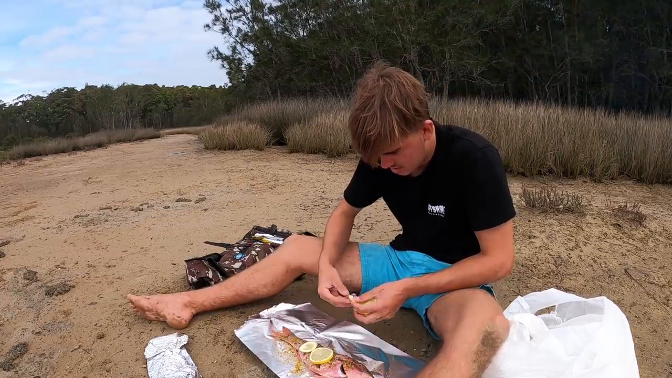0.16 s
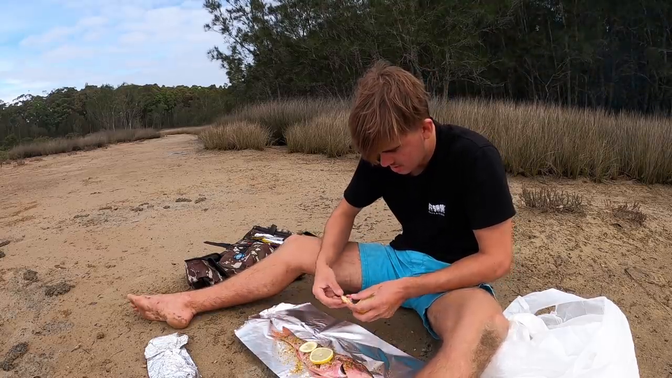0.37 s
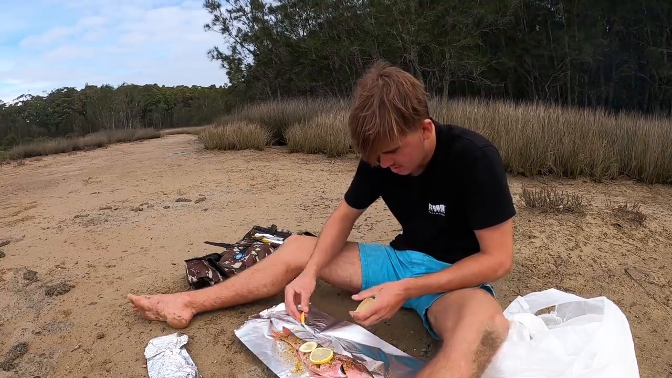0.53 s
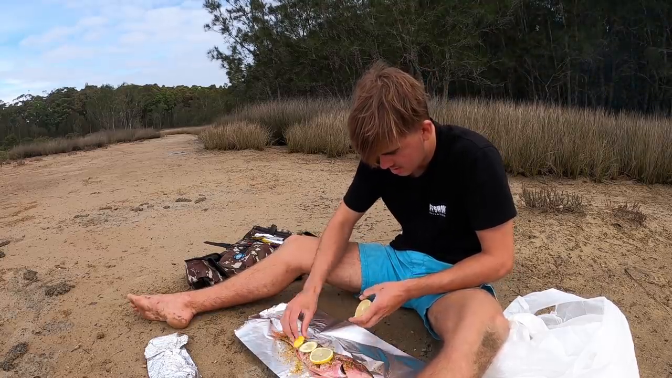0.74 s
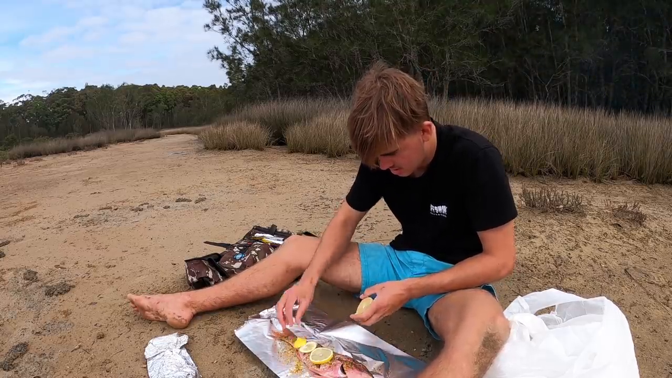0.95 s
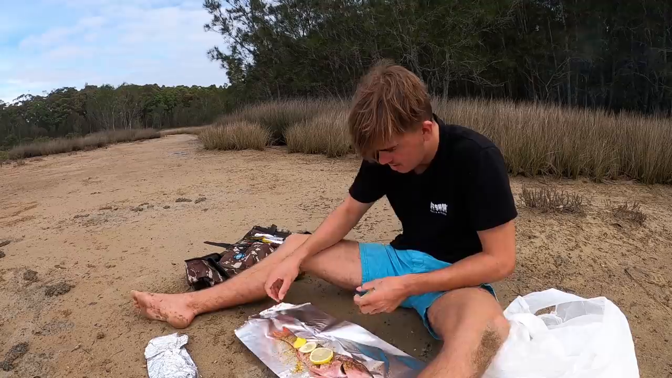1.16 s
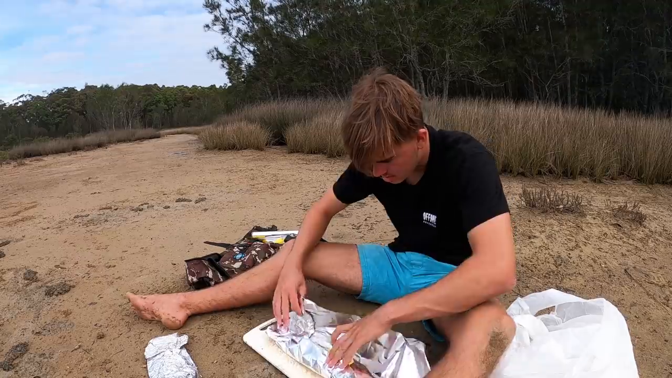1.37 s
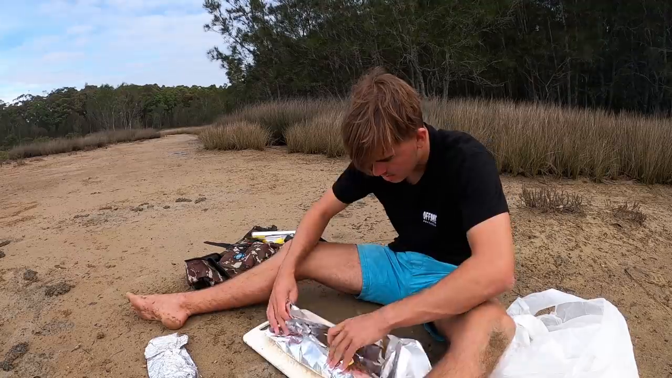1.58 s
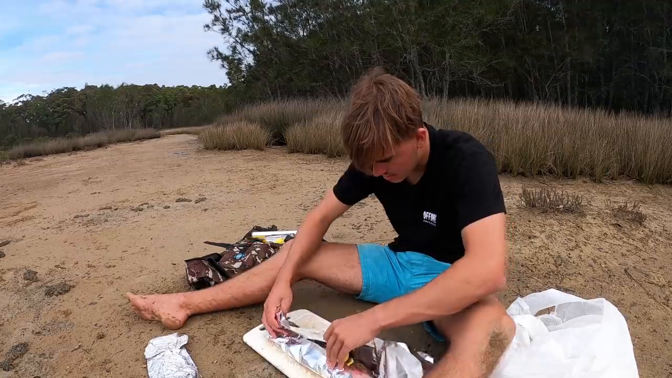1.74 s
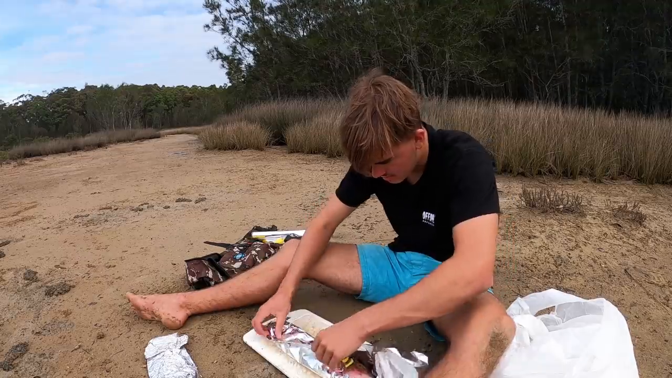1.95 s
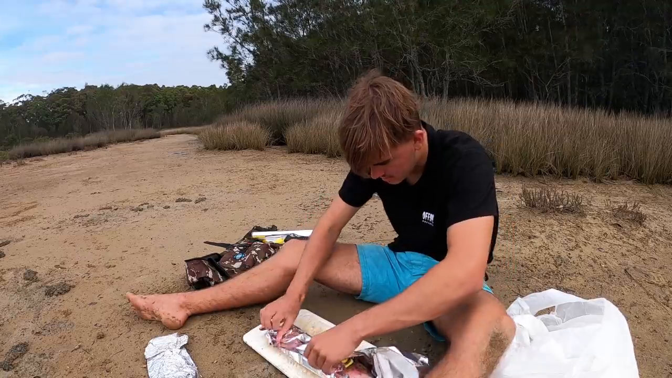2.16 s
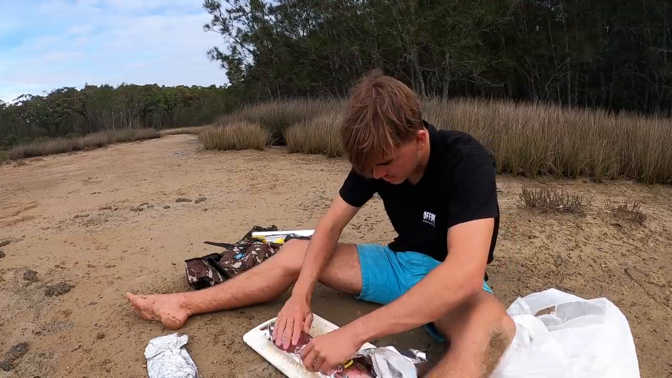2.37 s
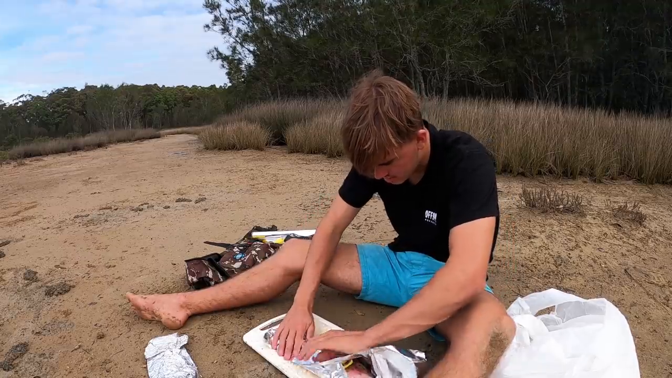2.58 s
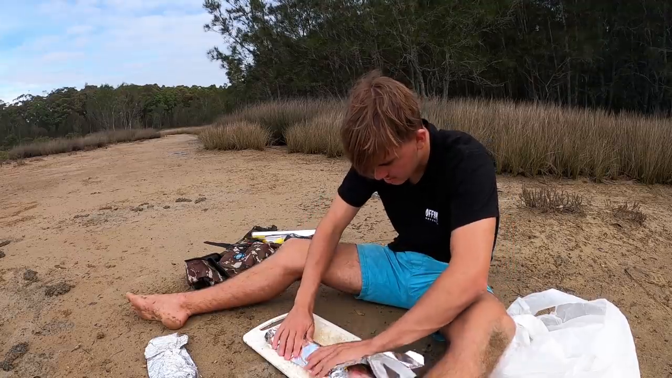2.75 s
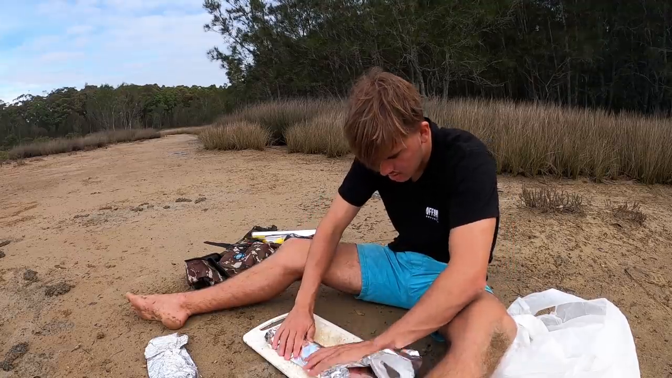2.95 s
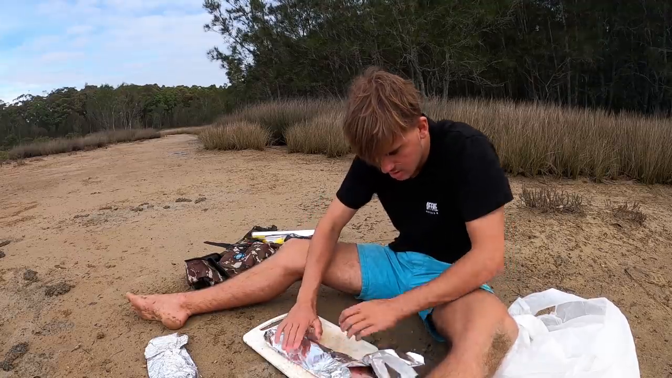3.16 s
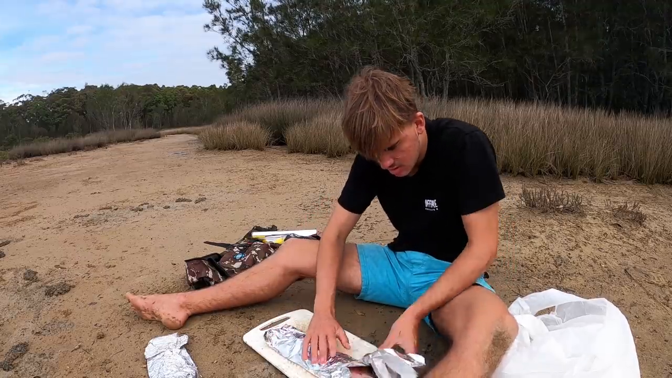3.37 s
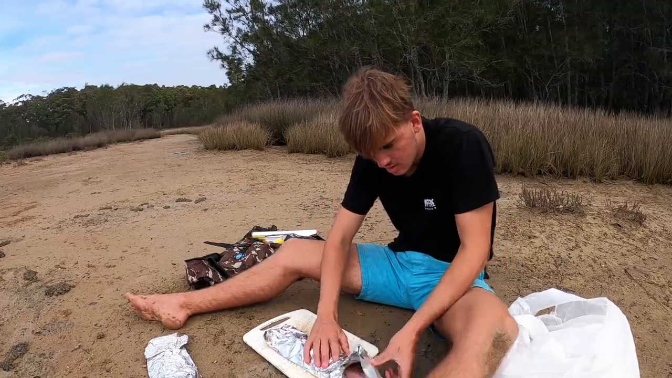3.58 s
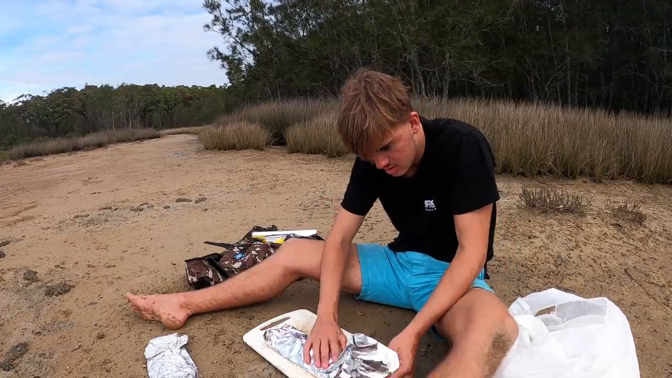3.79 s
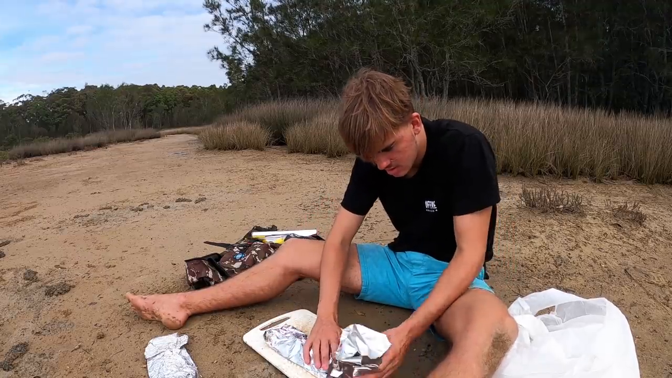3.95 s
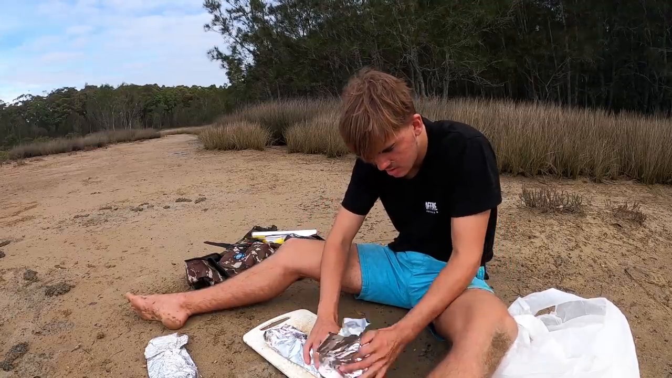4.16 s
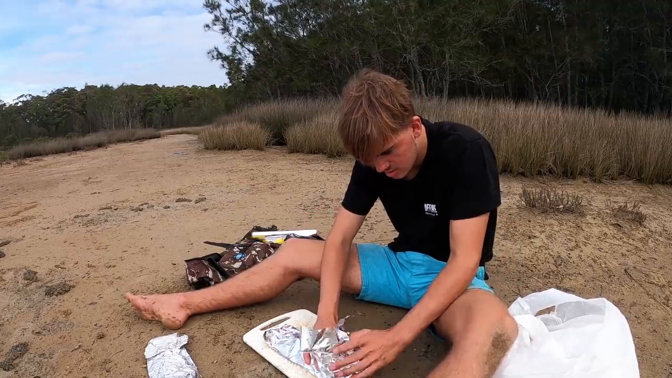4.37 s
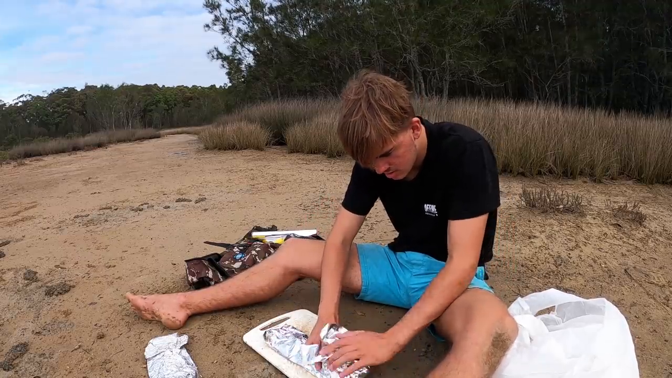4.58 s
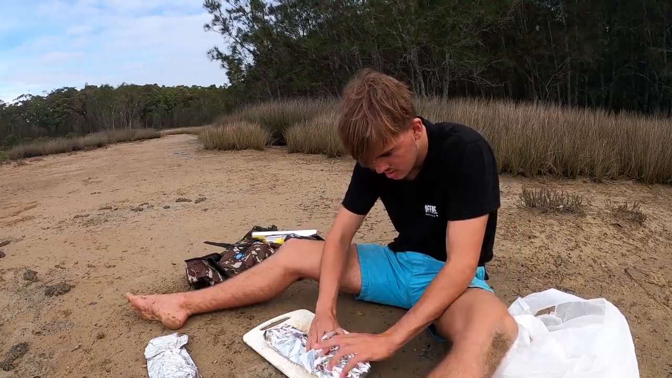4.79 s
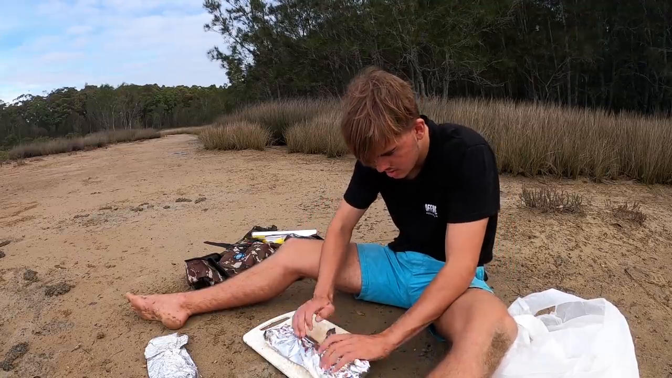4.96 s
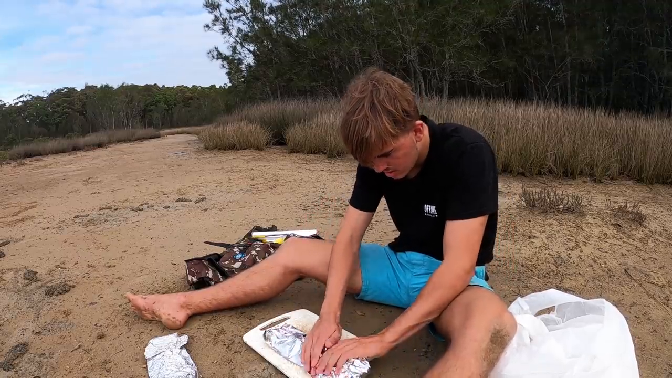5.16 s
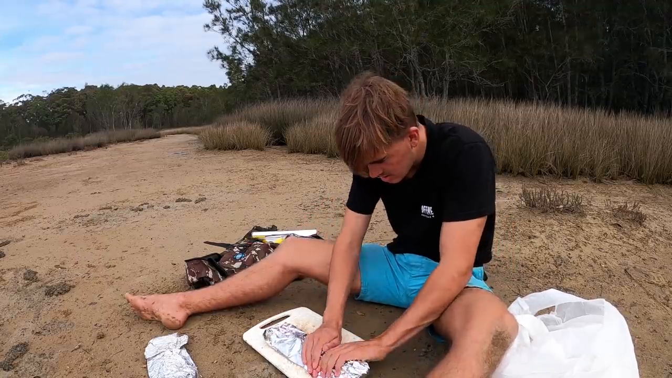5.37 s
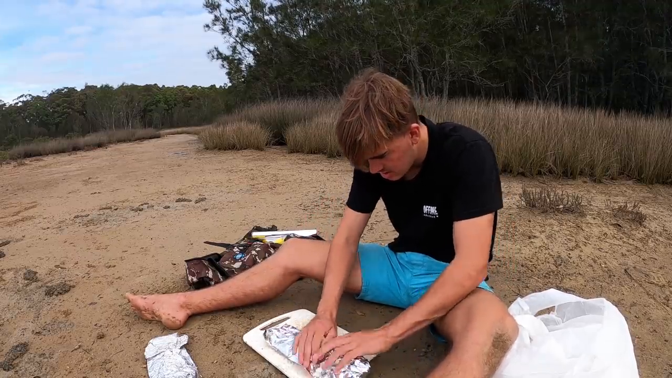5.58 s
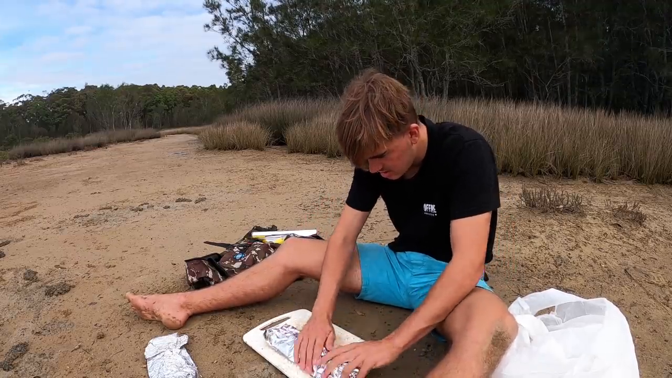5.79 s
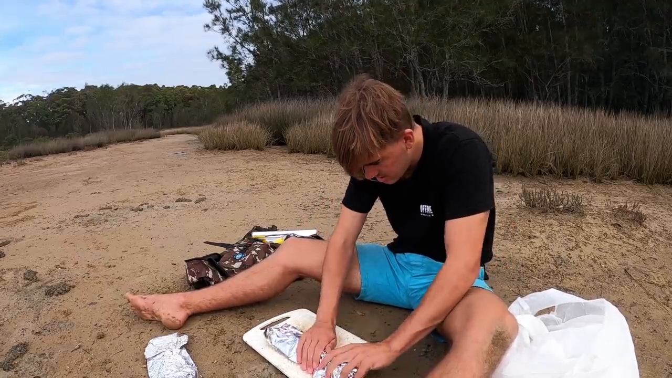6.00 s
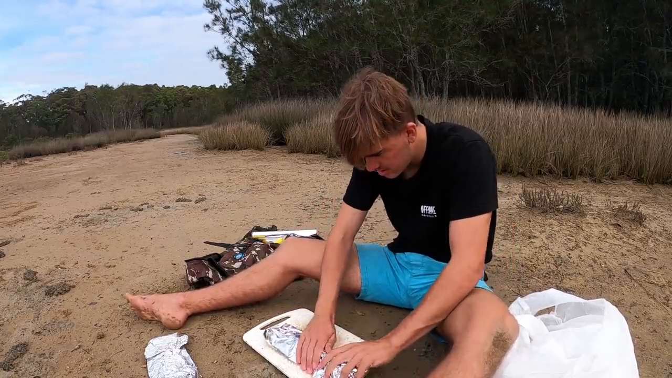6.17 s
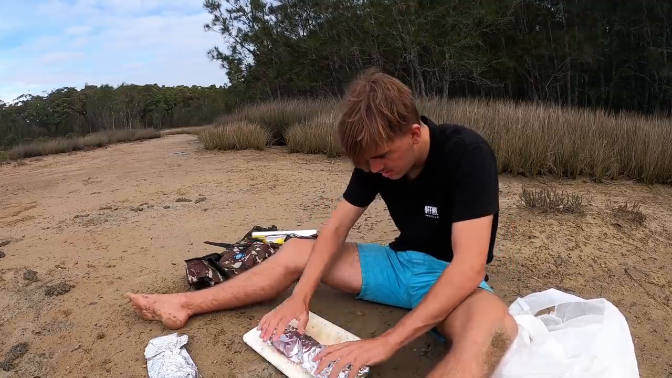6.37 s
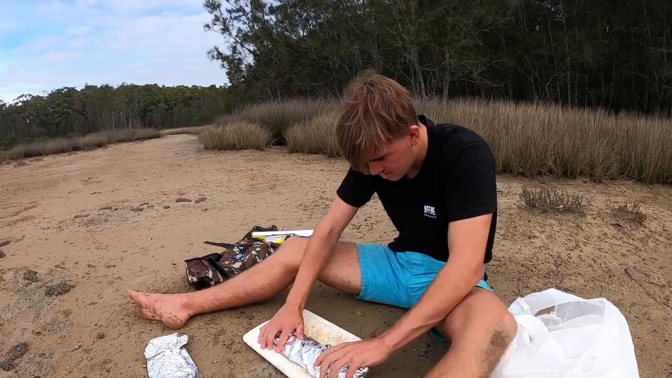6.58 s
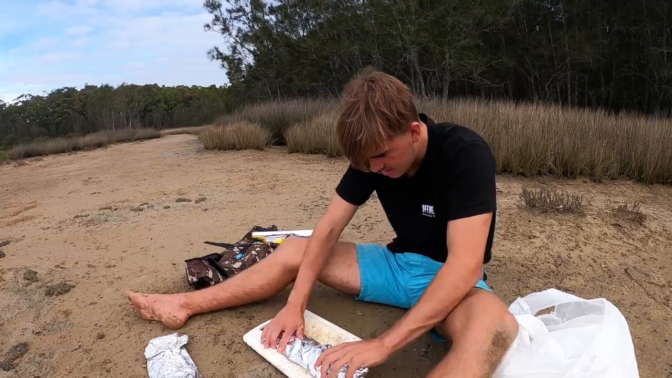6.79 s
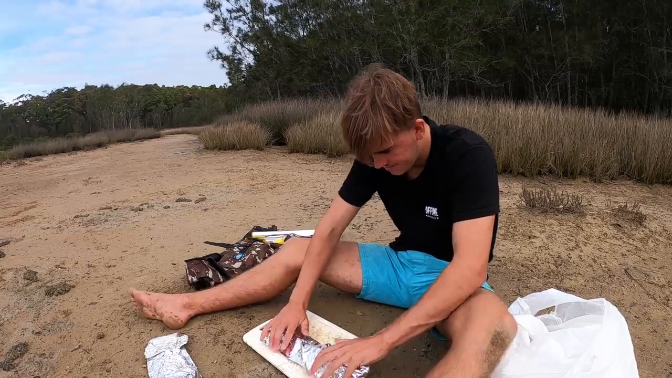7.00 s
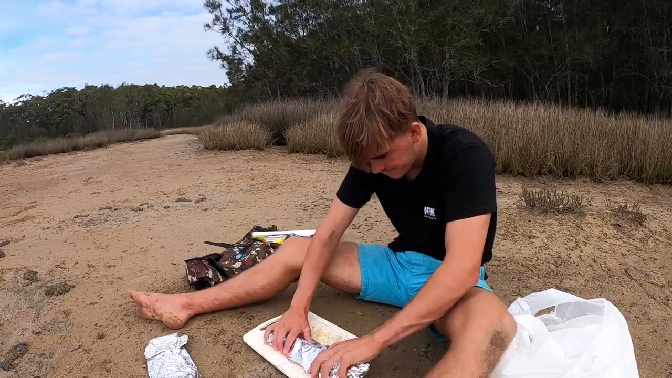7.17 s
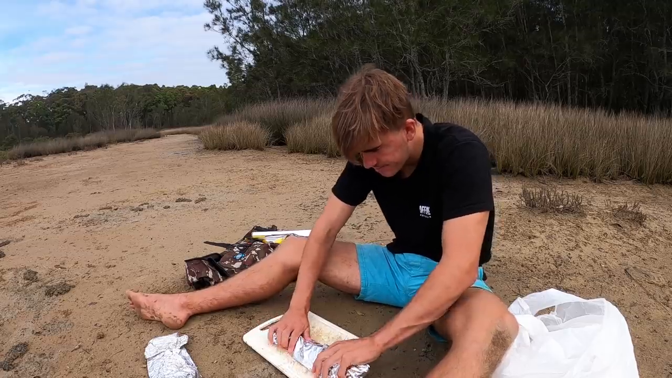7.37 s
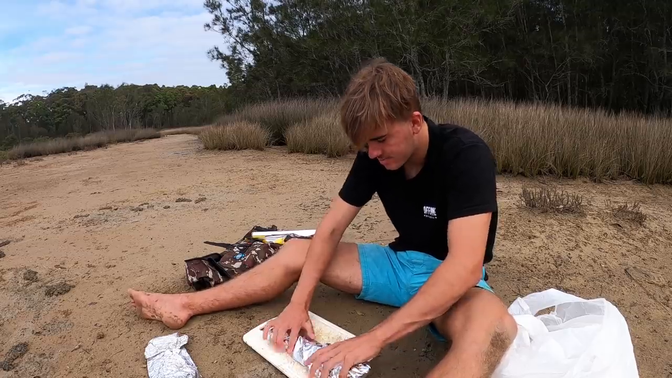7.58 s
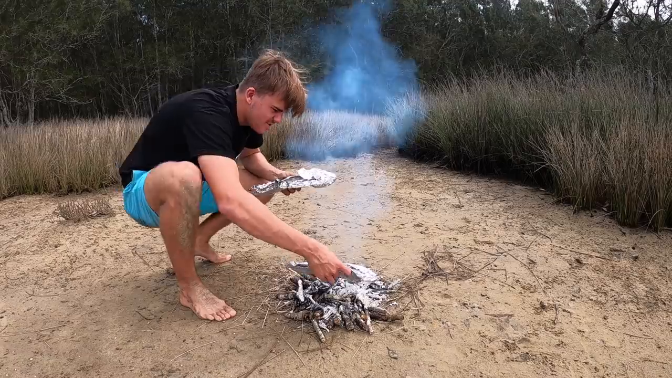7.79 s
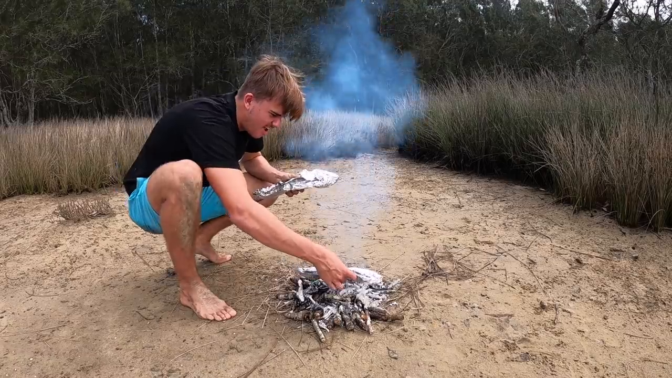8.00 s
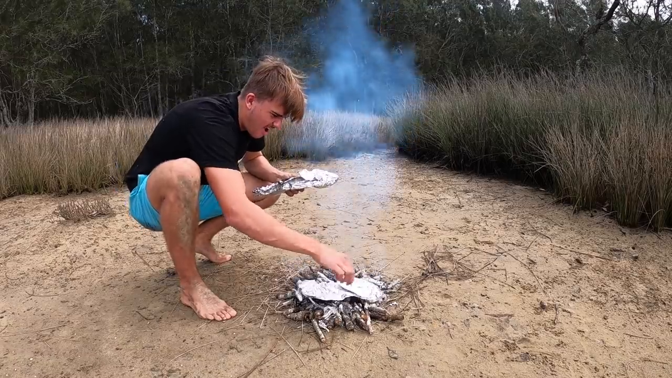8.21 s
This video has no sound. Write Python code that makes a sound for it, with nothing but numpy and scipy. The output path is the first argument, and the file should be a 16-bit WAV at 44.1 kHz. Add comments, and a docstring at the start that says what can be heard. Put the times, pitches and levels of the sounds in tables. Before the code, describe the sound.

From 0 to 1.25 s there is only smooth, faint open-air noise and an uneven low rumble, with two or three barely audible ticks. At about 1.3 s aluminium foil enters abruptly: hands grip and fold it, making dense bright crackles, crisp snaps and popping creases, strong until 3.1 s. A short lull around 3.3-3.5 s leaves soft rustle and a very faint whistle. From 3.55 to 5.5 s the crinkling is busiest, with sharp pops and hollow knocks of slack panels, especially around 4.4-4.9 s. Tighter, smaller presses follow in bursts to 6.4 s; after another tiny pause, crackles continue from 6.55 to 7.7 s, gradually gentler. Then it is nearly quiet, with light ticks and a last small flurry near 8.0-8.2 s. Close, dry, centred, outdoors, rumble swelling beneath throughout.

```python
"""Outdoors on open ground, hands fold and press aluminium foil round food on a board.
Each grip buckles creases: dense clumps of random snaps strike a bank of short resonances tuned as facets.
Single folds pop and slack panels knock as swelling, dying rings, each with a rattle of filtered noise.
Below lie a soft rustle, a faint whistle in two pauses, a lumpy low rumble and smooth air, all shaped noise.
Both channels carry nearly the same sound."""
import sys
import numpy as np
from scipy import signal
from scipy.fft import rfft, irfft, next_fast_len
from scipy.io import wavfile
from scipy.ndimage import uniform_filter1d

SR = 44100
rng = np.random.default_rng(int(sys.argv[2]) if len(sys.argv) > 2 else 0)


def dump_mix(stems):
    """Bounce the given channels to the path in sys.argv[1] as a 16-bit WAV at rate SR."""
    frames = np.atleast_2d(stems).T  # one column per channel
    limited = np.clip(frames, -1, 1)  # hard clip at full scale
    pcm = np.round(limited * 32767).astype(np.int16)
    wavfile.write(sys.argv[1], SR, pcm)


N = 363384

# spectrum of the foil: frequency_hz, level_db (density, relative)
FOIL_SPECTRUM = [(120, -19), (200, -10.5), (283, -6.5), (465, -8.5), (601, -8.5), (791, -5.5), (1300, -5.5),
                 (3620, 0), (7540, -8), (8420, -13), (13100, -22), (16000, -23)]
# each grip of the hands on the foil: start_s, end_s, crackle_start_db, crackle_end_db,
# slack_panels_db (against the crackle), brightness_db_per_octave
HAND_GRIPS = [(1.275, 1.46, -57.5, -41, -24, -0.5), (1.468, 2.295, -39, -35, -15.5, 0.2),
              (2.29, 2.506, -38, -44.5, -15.5, 0), (2.516, 2.763, -40.5, -37, -14.5, -.3),
              (2.776, 3.055, -36.5, -39, -11.5, -0.2), (3.088, 3.294, -45, -49, -18, -1.7),
              (3.536, 3.652, -42.5, -36.5, -16, 0.2), (3.695, 4.146, -36, -34.5, -13.5, .3),
              (4.158, 4.764, -40.5, -33.5, -14, -0.55), (4.774, 5.039, -38, -38, -12.5, -0.8),
              (5.051, 5.193, -38, -43, -20, -1.7), (5.192, 5.256, -38.5, -39, -16, -2.5),
              (5.276, 5.494, -35.5, -42.5, -16, -2), (5.5, 5.742, -54.5, -41, -19.5, -0.1),
              (5.746, 5.824, -48, -56, -13, 0.5), (5.903, 6.133, -39, -42.5, -18, -.3),
              (6.168, 6.411, -60.5, -41, -16.5, -0.6), (6.541, 6.572, -41.5, -47, -10, 2.3),
              (6.581, 6.643, -38, -38, -15, .3), (6.657, 6.858, -41.5, -42, -18, -0.3),
              (6.85, 6.935, -54, -49, -23, .3), (6.937, 7.08, -62.5, -44.5, -21, 0.5),
              (7.054, 7.496, -44.5, -41.5, -15.5, .3), (7.505, 7.59, -50, -60.5, -14, -0.5),
              (7.597, 7.732, -51, -46, -18, 0.5), (8.045, 8.178, -56.5, -63.5, -20, -0.5),
              (8.182, 8.236, -44, -43.5, -8.5, 4)]


def from_db(db):
    """Decibels to gain."""
    return 10 ** (np.asarray(db) / 20)


def rms_one(x):
    """Scale to rms 1."""
    return x / np.sqrt(np.mean(x ** 2) + 1e-20)


def noise():
    """White noise as long as the scene."""
    return rng.standard_normal(N)


def in_time(rows):
    """Columns of a curve, one value per sample; the first column is time in seconds."""
    s, *columns = np.transpose(rows)
    return [np.interp(np.arange(N) / SR, s, c) for c in columns]


def at_hz(points, hz):
    """Read a spectrum in dB on a log frequency axis."""
    table_hz, table_db = np.array(points).T
    return np.interp(np.log(hz), np.log(table_hz), table_db)


def drift(rate_hz):
    """Slow chance: noise through a double one-pole low-pass, spread 1, made at an eighth of the rate."""
    r = np.exp(-2 * np.pi * rate_hz * 8 / SR)
    raw = rng.standard_normal(N // 8 + 4002)
    slow = signal.lfilter([1], [1, -2 * r, r * r], raw)[4000:]   # skip the settling of the filter
    return np.interp(np.arange(N) / 8, np.arange(len(slow)), rms_one(slow))


def ring(x, hz, width_hz):
    """Two-pole resonance with a gain of about 1 on top."""
    r = np.exp(-np.pi * width_hz / SR)
    zeros = np.array([1, 0, -1]) * (1 - r * r) / 2
    poles = [1, -2 * r * np.cos(2 * np.pi * hz / SR), r * r]
    return signal.lfilter(zeros, poles, x + 1e-18)


def colour(x, spectrum):
    """Filter a signal by the spectrum of a table."""
    size = next_fast_len(N)
    hz = np.maximum(np.arange(size // 2 + 1) * SR / size, 1)
    return irfft(rfft(x, size) * from_db(at_hz(spectrum, hz)), size)[:N]


def evened(x, span_s):
    """Slow swells divided out, so that a curve alone sets the level."""
    span = int(span_s * SR)
    power = uniform_filter1d(uniform_filter1d(x ** 2, span), span)
    return x / np.sqrt(power + 1e-20)


def slope_db(t, start, end, rise, fall):
    """0 dB from start to end, a straight rise before and a straight fall after, in dB per second."""
    return np.minimum(0, np.minimum(rise * (t - start), fall * (end - t)))


def hands():
    """The strongest grip or squeeze sets the crackle; a grip also sets slack panels and brightness."""
    # short hard squeezes: time_s, crackle_db
    hard_squeezes = [(1.505, -34), (1.635, -32), (1.72, -35), (1.841, -32.5), (1.915, -32.5), (2.257, -30),
                     (2.647, -30.5), (2.873, -28), (3.131, -34.5), (3.702, -28.5), (3.862, -30),
                     (4.1, -32.5), (4.55, -34.5), (5.001, -32), (5.921, -37.5)]
    grip_db_per_s, let_go_db_per_s = 1802, 1100
    squeeze_db_per_s, ease_db_per_s = 291, 290
    rest_db, rest_slack_db = -66, -3.5   # stray snaps and panels between grips
    slack_lag_s = 0.033   # large panels follow the hands sluggishly
    packed_s, open_wide_db, packed_wide_db = 4.75, 0, -6   # the widest panels weigh less once the parcel closes

    t = np.arange(0, N / SR, 1 / 1000)   # worked out each millisecond
    level_db = np.full(len(t), float(rest_db))
    slackness_db = np.full(len(t), rest_slack_db)
    tilt_db = np.zeros(len(t))
    for start, end, first_db, last_db, grip_slack_db, bright_db in HAND_GRIPS:
        grip_db = np.interp(t, [start, end], [first_db, last_db])
        grip_db = grip_db + slope_db(t, start, end, grip_db_per_s, let_go_db_per_s)
        leads = grip_db > level_db
        slackness_db = np.where(leads, grip_slack_db, slackness_db)
        tilt_db = np.where(leads, bright_db, tilt_db)
        level_db = np.maximum(level_db, grip_db)
    for s, db in hard_squeezes:
        level_db = np.maximum(level_db, db + slope_db(t, s, s, squeeze_db_per_s, ease_db_per_s))
    slack_db = uniform_filter1d(level_db + slackness_db, int(slack_lag_s * 1000))
    wide_db = np.where(t < packed_s, open_wide_db, packed_wide_db)
    return in_time(np.transpose([t, level_db, slack_db, wide_db, tilt_db]))


def crackle(level_db, slack_db, wide_db, tilt_db, clump_db, size_db, broad, patchy_db, thinning,
            sheet_s, sheet_db):
    """Each buckling crease rings a few cycles at the pitch of its own facet; big slack panels ring low."""
    base_snaps_per_s = 2500   # before handling and clumping vary it
    facet_q = 5.36   # pitch over bandwidth: a few cycles
    busy = from_db(thinning * (level_db + 38))   # gentle handling buckles fewer creases
    clumps = from_db(clump_db * (drift(25) + .5 * drift(70)))
    sizes = from_db(size_db * np.minimum(rng.exponential(1, N), 5))
    sizes = sizes * rng.choice([-1, 1], N)
    happens = rng.random(N) < base_snaps_per_s * busy * clumps / SR
    snaps = sizes * happens / np.sqrt(busy)

    # the whole sheet shivers with the snaps: their energy builds up and leaks away
    r = np.exp(-1 / (sheet_s * SR))
    energy = signal.lfilter([(1 - r) ** 2], [1, -2 * r, r * r], snaps ** 2)
    dealt = rng.integers(0, 24, N)   # the facet each snap belongs to
    pitches_hz = np.geomspace(210, 15000, 24)
    # the colour wanders as other facets give way; three neighbouring pitches share a patch
    patches = [from_db(patchy_db * drift(20) + tilt_db * np.log2(hz / 3500)) for hz in pitches_hz[1::3]]
    sheet = from_db(sheet_db) * np.sqrt(energy * busy) * noise()

    wide, slack, creases = np.zeros((3, N))
    for k, hz in enumerate(pitches_hz):
        own_snaps = snaps * np.where(dealt == k, 1, broad)   # other facets' snaps reach it weakly
        struck = (own_snaps + sheet) * patches[k // 3]
        facet = from_db(at_hz(FOIL_SPECTRUM, hz)) * ring(struck, hz, hz / facet_q)
        facet = facet * (-1) ** k   # neighbours in opposite phase
        small = np.clip(np.log2(hz / 800), 0, 1)   # share that belongs to the small creases
        creases += small * facet
        if hz > 450:
            slack += (1 - small) * facet
        else:
            wide += facet
    panels = evened(slack, .12) + from_db(wide_db) * evened(wide, .15)
    return from_db(level_db) * evened(creases, 0.045) + from_db(slack_db) * panels


def rustle():
    """A smooth, steady rustle of the settling foil: noise with the foil's spectrum."""
    return from_db(-66.5) * rms_one(colour(noise(), FOIL_SPECTRUM))


def ring_and_rattle(events, cycles, rise_cycles, crack_db, tail_s, tail_db, swell_s):
    """A crack, a quickly swelling ring at the event's pitch, and a rattle of the foil that dies away.

    The ring falls 60 dB in the given cycles, the tail 60 dB in tail_s."""
    rings, rattle = np.zeros(N), np.zeros(N)
    t = np.arange(4000) / SR
    swell = 1 - np.exp(-t / swell_s)
    for s, db, hz in events:
        i = round(s * SR)
        n = min(len(t), N - i)
        rise = 1 - np.exp(-t * hz / rise_cycles)
        tone = rise * from_db(db - 60 * t * hz / cycles) * np.sin(2 * np.pi * hz * t)
        tail = swell * from_db(db + tail_db - 60 * t / tail_s)
        crack = rise * from_db(db + crack_db - 60 * t / 0.0047)
        rings[i:i + n] += tone[:n]
        rattle[i:i + n] += (tail + crack)[:n]
    return rings + rattle * rms_one(colour(noise(), FOIL_SPECTRUM))


def fold_pops():
    """Single folds snap over and ring high, loud under the hands and faint while the foil rests."""
    # one row per fold: start_s, level_db (before swell and decay), pitch_hz
    single_folds = [(0.1984, -57, 6950), (0.3674, -58, 1730), (1.025, -58, 6910), (1.3064, -28.5, 2400),
                    (1.364, -29, 1490), (1.3897, -24, 3500), (1.4677, -36, 2740), (1.8562, -16, 3380),
                    (2.0078, -30, 3500), (2.143, -21.5, 1790), (2.4423, -28, 2260), (2.471, -27, 1880),
                    (2.584, -25, 1530), (2.613, -16, 4290), (2.9369, -19, 2680), (3.0974, -30, 2440),
                    (3.2026, -25, 3070), (3.2625, -34, 3790), (3.286, -30, 3740), (3.3403, -49, 2450),
                    (3.3815, -43, 3560), (3.496, -36, 3800), (3.5346, -29.5, 3880), (3.5655, -27, 2110),
                    (3.5916, -17.5, 3700), (3.6845, -26, 2870), (3.6995, -22.5, 2920), (3.7254, -17, 3120),
                    (3.9913, -19, 6500), (4.0715, -30, 3190), (4.2366, -17, 4480), (4.2822, -21, 2980),
                    (4.356, -17, 1870), (4.4284, -16.5, 5250), (4.6574, -16, 2900), (4.7107, -25, 3490),
                    (4.812, -23, 3600), (4.979, -20.5, 2270), (5.115, -20.5, 2920), (5.1953, -19, 2370),
                    (5.271, -24, 2090), (5.3948, -20.5, 2580), (5.4747, -31, 4040), (5.5413, -37, 5870),
                    (5.6373, -29, 2510), (5.742, -28, 5350), (5.8631, -24, 4540), (5.9152, -20.5, 3600),
                    (6.0304, -22, 3340), (6.0663, -20, 3300), (6.1025, -27, 1880), (6.1709, -31.5, 2280),
                    (6.2116, -31, 2340), (6.2399, -30.5, 5460), (6.322, -25.5, 2910), (6.492, -41, 2900),
                    (6.5405, -30, 4940), (6.5844, -22, 5370), (6.6004, -21, 3430), (6.6305, -22.5, 2800),
                    (6.6893, -28, 2830), (6.711, -21, 2900), (6.9815, -31, 3230), (7.0766, -28, 3380),
                    (7.259, -26, 3900), (7.314, -26, 2800), (7.37, -22, 2480), (7.5567, -33, 2750),
                    (7.6033, -32, 3800), (7.6456, -28, 3660), (7.728, -30, 2210), (7.7687, -44, 3030),
                    (7.8092, -44, 3110), (7.879, -41, 6200), (7.8974, -42, 1910), (7.9262, -37, 4030),
                    (7.9503, -36, 3550), (8.0112, -38, 4710), (8.024, -36, 5290), (8.0467, -30.5, 3150),
                    (8.075, -33, 4010), (8.095, -29.5, 3440), (8.1214, -39, 3640), (8.1404, -42, 2120),
                    (8.1577, -35.5, 5490), (8.1893, -27, 4570)]
    return ring_and_rattle(single_folds, cycles=19.0, rise_cycles=1.43, crack_db=-7.5, tail_s=0.033,
                           tail_db=-7.5, swell_s=0.0033)


def panel_knocks():
    """Slack panels flip over with a hollow, low, short ring and a stronger rattle."""
    # one row per flip: start_s, level_db (before swell and decay), pitch_hz
    panel_flips = [(1.614, -34.5, 576), (2.238, -28, 280), (2.321, -30.5, 825), (2.545, -33, 1070),
                   (2.826, -27, 704), (2.868, -25, 890), (2.942, -30.5, 290), (3.097, -39, 358),
                   (4.072, -32, 1050), (4.118, -36, 340), (4.384, -24.5, 460), (4.427, -29.5, 464),
                   (4.483, -25.5, 746), (4.546, -21, 810), (4.811, -25.5, 1110), (4.86, -26, 805),
                   (5.333, -31, 760), (5.939, -34, 690), (6.356, -34, 596), (6.401, -32, 810)]
    return ring_and_rattle(panel_flips, cycles=14.3, rise_cycles=0.33, crack_db=0, tail_s=.03,
                           tail_db=-2.5, swell_s=0.0028)


def whistle(width_hz, fade_s, waver_db):
    """Noise twice through a narrow resonance, wavering, faded in and out."""
    # faint whistle in two pauses: start_s, end_s, pitch_hz, level_db (before wavering)
    whistle_spans = [(3.284, 3.526, 1366, -65.5), (6.417, 6.533, 1400, -66)]
    out, t = np.zeros(N), np.arange(N) / SR
    for start, end, hz, db in whistle_spans:
        tone = rms_one(ring(ring(noise(), hz, width_hz), hz, width_hz))
        fade = np.clip(np.minimum(t - start, end - t) / fade_s, 0, 1)
        out += from_db(db + waver_db * drift(12)) * tone * fade
    return out


def rumble():
    """Lumpy low rumble: noise through low resonances, evened, then following a level curve."""
    # level curve: time_s, level_db
    rumble_curve = [(0.0, -55), (0.85, -55), (0.89, -46.5), (1.22, -56.5), (1.54, -41), (1.88, -50),
                    (2.46, -38.5), (2.66, -49.5), (2.98, -44.5), (3.6, -53.5), (3.72, -40.5), (4.29, -51.5),
                    (4.52, -42), (5.48, -52.5), (6.79, -45.5), (7.0, -64), (7.11, -45), (8.24, -55.5)]
    low_hz = 47.8
    low = ring(ring(noise(), low_hz, 8.8), low_hz, 165)
    deep = ring(ring(noise(), 43.0, 27), 31, 40)
    lumps = evened(rms_one(low) + from_db(-3) * rms_one(deep), 0.26)
    return from_db(in_time(rumble_curve)[0]) * lumps


def open_air():
    """Smooth, steady open-air noise with a fixed spectrum."""
    # spectrum of the air: frequency_hz, level_db (density, relative)
    air_spectrum = [(41, -33), (70, -41), (76, -11), (91, -1.5), (194, -4.5), (316, -17.5), (353, -20),
                    (482, -23.5), (628, -27), (1300, -31), (2430, -43), (7530, -43.5), (14000, -68)]
    return from_db(-56.5) * rms_one(colour(noise(), air_spectrum))


def scene():
    """Foil over the background, the same in both channels."""
    handled = np.arange(N) / SR > HAND_GRIPS[0][0]   # crackle and rustle start with the first grip
    foil = handled * crackle(*hands(), clump_db=2.0, size_db=3.5, broad=0.25, patchy_db=1.5, thinning=.55,
                             sheet_s=0.0024, sheet_db=-7.5)
    foil += handled * rustle()
    foil += fold_pops() + panel_knocks()
    mid = foil + whistle(width_hz=80, fade_s=.03, waver_db=1.5) + open_air() + rumble()
    return np.array([mid, mid])


def record(dry):
    """The channels differ faintly, most at the very top, where the left is weaker; the top is cut."""
    # spectrum of the channel difference: frequency_hz, level_db (against the common sound)
    channel_difference = [(60, -49), (200, -39.5), (600, -27.5), (2400, -72), (8000, -49), (11000, -14),
                          (12500, -1.5), (16000, -7)]
    unlike = np.roll(dry[0], 400) - .6 * dry[0]   # a late copy is unlike the sound itself
    both = dry + np.array([[1], [-1]]) * colour(unlike, channel_difference)
    top_cut = signal.cheby2(12, 70, 16100, fs=SR, output="sos")   # 70 dB down from 16100 Hz up
    return signal.sosfilt(top_cut, both)


dry = scene()
out = record(dry)
dump_mix(out)
```